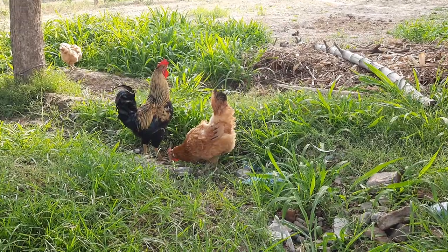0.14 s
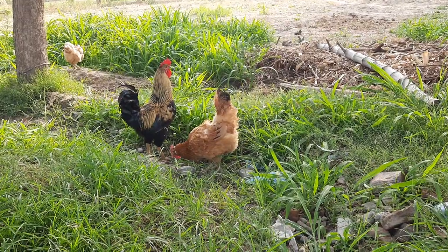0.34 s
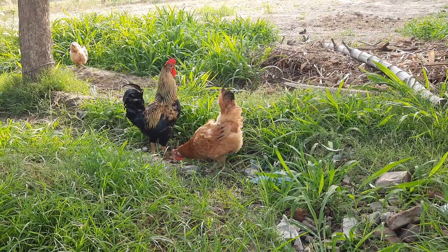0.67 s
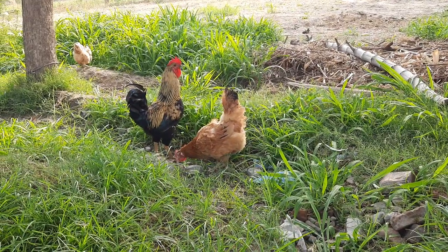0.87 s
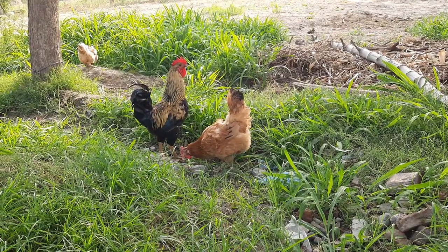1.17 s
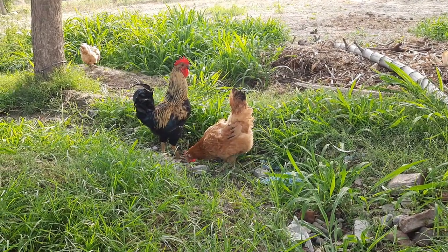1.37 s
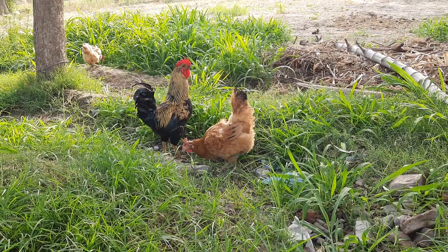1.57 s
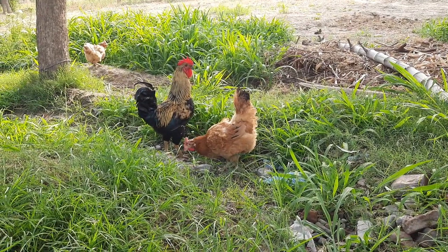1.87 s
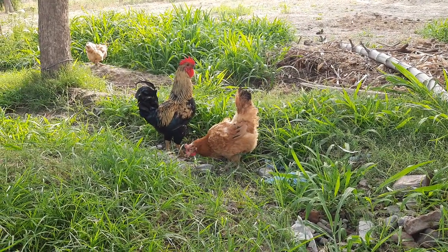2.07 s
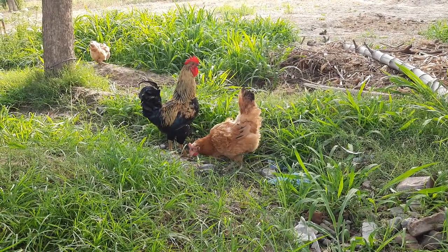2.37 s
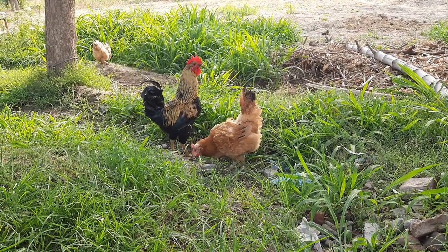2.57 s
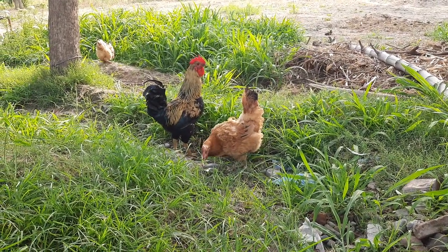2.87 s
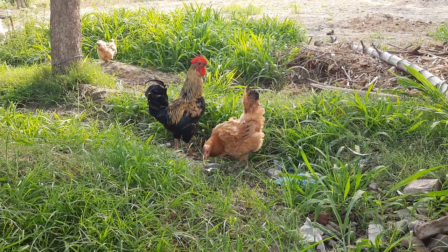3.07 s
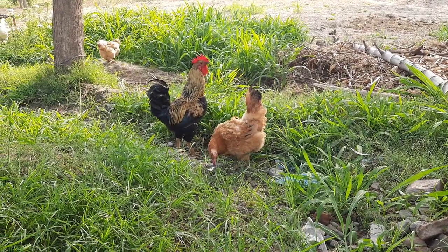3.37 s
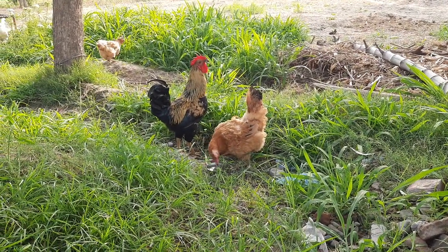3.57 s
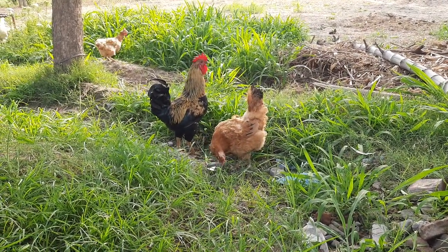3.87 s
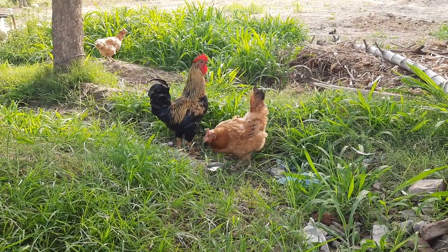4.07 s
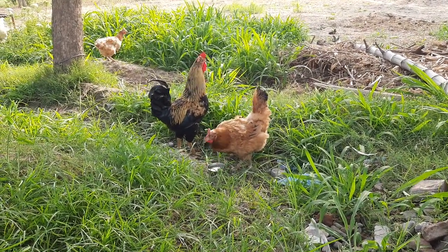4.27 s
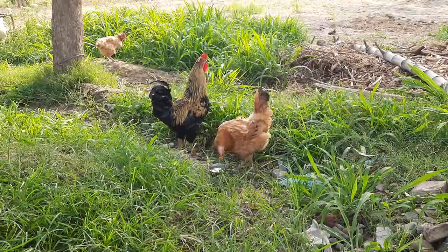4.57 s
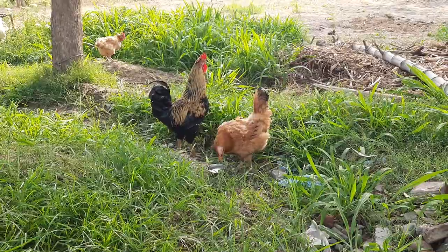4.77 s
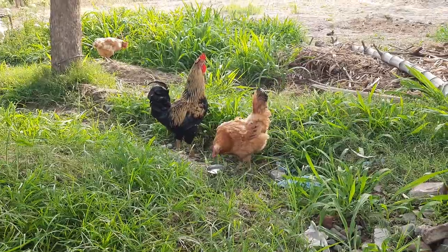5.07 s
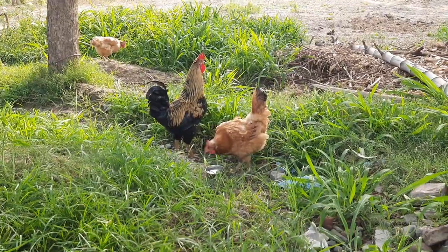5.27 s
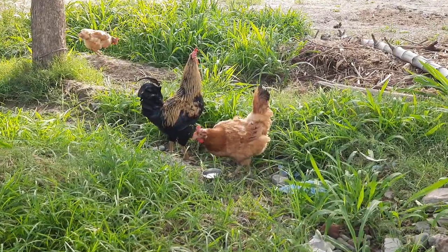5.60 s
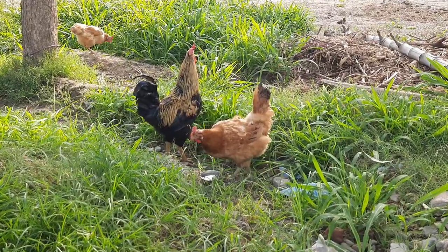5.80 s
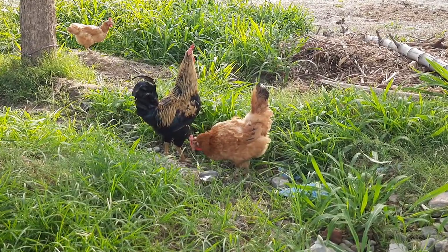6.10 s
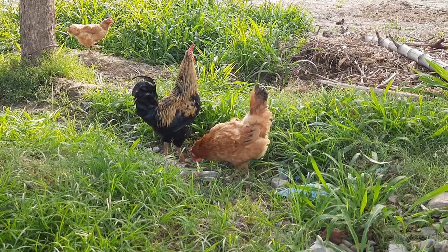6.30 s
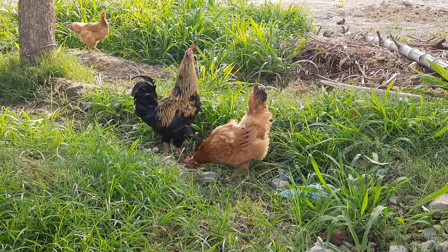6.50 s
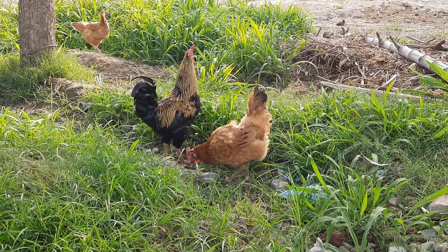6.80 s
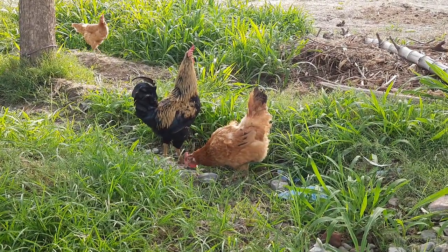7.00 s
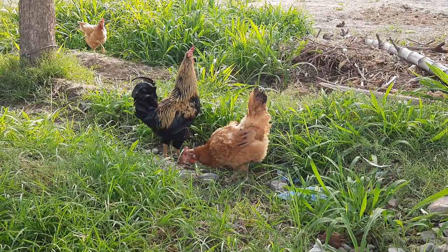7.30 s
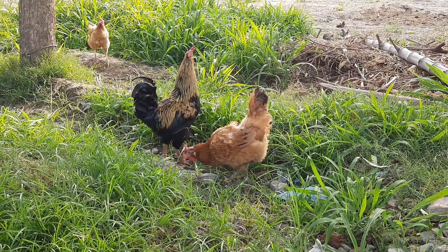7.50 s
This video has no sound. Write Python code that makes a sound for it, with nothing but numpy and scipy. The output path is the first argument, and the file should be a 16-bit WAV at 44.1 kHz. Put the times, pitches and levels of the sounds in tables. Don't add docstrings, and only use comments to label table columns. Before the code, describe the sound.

Hand-held microphone in a grassy yard with chickens. Crackly handling noise comes first, followed by abrupt, extremely close pops and knocks almost entirely in the right channel, far louder than everything else. Faint hen calls, high warbling runs and a fine insect trill sit behind, with soft rumble and leaf hiss. The later part is calmer and thinner on the right: distant whistles, two short raspy sparrow squawks, and a swell of leaves.

```python
import sys
import numpy as np
from scipy import signal
from scipy.fft import rfft, irfft, next_fast_len
from scipy.io import wavfile
from scipy.ndimage import uniform_filter1d, map_coordinates

SR = 44100
rng = np.random.default_rng(int(sys.argv[2]) if len(sys.argv) > 2 else 0)


def voltage_ratio(decibels):
    exponent = np.asarray(decibels, float) / 20
    return 10 ** exponent


def unload_audio(sound):
    columns = np.transpose(np.atleast_2d(sound))
    steps = np.round(np.clip(columns, -1, 1) * 32767)
    wavfile.write(sys.argv[1], SR, steps.astype(np.int16))


N = 337365

# start_s, peak_db, contact_ms, ring_db, knock_db
PUSHES = [(1.88727, -5.5, .08, 1, -19), (1.89519, -12.5, .1, -18, -12.5), (2.44434, -5.5, .068, -1, -19),
          (3.88983, -5.5, .057, -.5, -20), (4.34376, -1, .061, -8, -22), (4.40414, -8.5, .084, -43, -15),
          (3.53, -5.5, .07, 0, -17), (3.53062, -4.5, .05, -7, -15), (3.5376, -20, .2, -40, -4),
          (3.5609, -18, .25, -30, -10), (1.81, -29, .19, -12, -14), (3.9037, -22, .19, -25, -14),
          (3.9074, -27, .11, -18, -16), (3.9981, -25, .16, -28, -14)]
# start_s, peak_db, contact_ms, knock_db
PULLS = [
    (4.28568, -7, .039, -13.5),
    (4.37226, -.5, .037, -16.5),
    (3.99173, -14, .05, -13),
    (4.38402, -14, .03, -11.5),
    (.7501, -27, .15, -12),
    (1.991, -28, .06, -13),
    (3.547, -28, .05, -13),
    (3.8999, -25, .05, -13),
]
CASE_MODES = {1: [(1140, 1, .008), (570, -4, .007), (315, 5.5, .009)], -1: [(1110, 8.5, .0045),
              (553, 6, .008)]}
SPRING_BACK = {1: (.19, .0001, 0), -1: (.36, 0, .00014)}


def taps():
    out = np.zeros((2, N))
    t = np.arange(-40, 900) / SR
    after = np.clip(t, 0, 1)
    touch = np.clip(t + .00016, 0, 1)
    ring = voltage_ratio(10 - 60 * touch / .0018) * np.clip(touch / .00037, 0, 1) * np.cos(2 * np.pi * 6800 * t)
    ring += voltage_ratio(0.5 - 60 * np.abs(t) / 0.00033) * np.cos(2 * np.pi * 13200 * t)
    snap = voltage_ratio(9 - 60 * after / .00048) * np.clip(after / .00014, 0, 1) * np.cos(2 * np.pi * 4150 * t)
    snap += voltage_ratio(7 - 60 * after / .0015) * np.sin(2 * np.pi * 1030 * after)
    touches = [(*push, 1) for push in PUSHES]
    touches += [(*pull[:3], 0, pull[3], -1) for pull in PULLS]
    for s, db, contact_ms, ring_db, knock_db, sign in touches:
        width = contact_ms / 1000
        share, delay_s, spread_s = SPRING_BACK[sign]
        back_s, back_width = np.hypot(delay_s, 3 * width), np.hypot(spread_s, 3.7 * width)
        back = np.exp(-((t - back_s) / back_width) ** 2 / 2)
        pulse = np.exp(-(t / width) ** 2 / 2) - share * back
        pulse += voltage_ratio(ring_db) * (ring if sign > 0 else snap)
        modes = []
        for hz, level, t60 in CASE_MODES[sign]:
            softness = np.exp(-(np.pi * hz * width) ** 2)
            decay = voltage_ratio(knock_db + level - 60 * after / t60)
            modes.append(-decay * np.sin(2 * np.pi * hz * after) * softness)
        left = voltage_ratio(-54) * np.exp(-((t - .0006) / .0004) ** 2) * rng.standard_normal(len(t))
        if sign > 0:
            left += voltage_ratio(-8) * np.roll(modes[0], shift=24)
        else:
            left -= voltage_ratio(-15) * np.roll(modes[1], shift=15)
        add(out, s + t[0], sign * voltage_ratio(db) * np.array([left, pulse + sum(modes)]))
    null_hz, width_hz = 9020, 1800
    return filtered(out, lambda f: 1 - 1j * f * width_hz / (null_hz ** 2 - f * f + 1j * f * width_hz))


# start_s, length_s, level_db, dull_weight_db
SLIDES = [(0, 1, -69, 7), (0.394, 0.85, -67.5, 8.5), (0.947, 0.99, -81, 13.5), (1.75, 0.44, -75, 12.5),
          (2.21, 0.33, -70.5, 11.5), (2.42, 0.38, -68.5, 9.5), (2.634, 0.43, -63.5, 10),
          (3.035, 0.21, -67.5, 7.5), (3.15, 0.32, -65.5, 5), (3.4, 0.47, -73, -3),
          (3.709, 0.28, -56.5, -7.5), (3.891, 0.33, -63, -25), (4.2, 0.49, -72, -3), (7.48, 0.55, -71, -16)]
# start_s, peak_db
TICKS = [(0.0507, -45.5), (0.1864, -41.5), (.0995, -51), (0.2402, -43), (0.3616, -55), (.604, -39),
         (.642, -55), (.666, -55), (0.715, -43), (.766, -60), (.806, -53), (2.645, -40.5), (3.105, -49),
         (0.2721, -37.5), (0.3072, -43), (0.383, -43), (0.416, -43.5), (0.5154, -57), (0.5276, -40.5),
         (0.551, -52), (0.593, -36.5), (0.68, -41.5), (.6974, -41), (0.7317, -39.5), (0.7495, -34),
         (0.7868, -28.5), (0.819, -34.5), (0.837, -44), (1.0858, -47), (1.306, -45), (1.7883, -39),
         (2.468, -37), (2.5258, -36.5), (2.771, -39), (2.778, -41), (2.826, -40), (2.839, -35),
         (2.938, -43), (3.0497, -42), (3.5585, -25), (0.736, -37.5), (4.4605, -31)]


def rustle():
    resting_db, peaks_at = -90, 0.38
    t = np.arange(N) / SR
    bright, dull = np.full(N, voltage_ratio(resting_db)), np.full(N, voltage_ratio(resting_db + 2))
    for s, length, db, weight_db in SLIDES:
        rise_and_fall = np.interp(t, [s, s + peaks_at * length, s + length], [0, 1, 0])
        speed = np.sin(np.pi / 2 * rise_and_fall) ** 2
        bright += voltage_ratio(db) * speed
        dull += voltage_ratio(db + weight_db) * speed
    crackle = voltage_ratio(2.7 * wobble(45) + 3.0 * wobble(280))
    body = voltage_ratio(-1.0) * dull * unit(crackle * rng.standard_normal((2, N)))
    shine = voltage_ratio([[-5], [-1]]) * bright * unit(crackle * rng.standard_normal((2, N)))
    t = np.arange(200) / SR
    side = voltage_ratio([[-4], [0]])
    for s, db in TICKS:
        shine_db = -62.5 + (0.33 - 1) * (db + 37.0) + 38.5
        burst = voltage_ratio(db - 60 * t / 0.011) * np.clip(t / 0.00051, 0, 1) * rng.standard_normal((2, 2, len(t)))
        add(body, s, voltage_ratio(-0.5) * side * burst[0])
        add(shine, s, voltage_ratio(shine_db + 12.0) * side * burst[1])
    low = [(1500, -30.0), (2300, -0.5), (5500, -1.0), (9000, -14.5), (16000, -38.0)]
    high = [(5000, -9.5), (8500, -5.5), (15600, 6.5), (16000, -60.5)]
    return shaped(body, low) + shaped(shine, high)


# start_s, pitch_hz, level_db
SPARROW = [
    [(6.54, 1080, -62), (6.552, 1290, -48), (6.565, 1550, -46), (6.575, 2000, -46), (6.582, 2100, -60)],
    [(6.575, 3820, -50), (6.59, 3880, -39), (6.612, 4020, -35), (6.628, 3850, -35), (6.65, 3450, -35),
     (6.66, 3350, -54)],
    [(6.658, 2300, -56), (6.668, 1900, -44), (6.678, 1750, -44), (6.688, 1500, -58)],
    [(6.827, 1750, -58), (6.833, 1880, -45), (6.84, 2150, -50), (6.847, 2270, -40), (6.856, 2330, -43),
     (6.862, 2640, -38), (6.885, 2670, -38), (6.903, 2400, -50)],
    [(6.899, 2250, -56), (6.905, 2080, -37), (6.922, 1800, -36), (6.942, 1520, -41), (6.952, 1450, -62)],
]
RASP = [.4, .06, .55, .09, .12]
# pitch_hz, level_db
BEAK = [(1000, -30), (1900, -21), (2700, -6), (3700, 0), (4400, -3), (5300, -14), (8000, -20), (16000, -56)]
# pitch_hz, level_db
BREATH = [(1000, -26), (2200, -7), (3800, 4.5), (6000, -4.5), (9000, -17), (15600, -32), (15900, -70)]


def sparrow():
    squawk_db, breath_db = -2, -7.5
    out, air = np.zeros((2, N))
    for rows, rasp in zip(SPARROW, RASP):
        t = np.arange(rows[0][0], rows[-1][0], 1 / SR)
        count = len(t)
        hz, db = curves(rows, t)
        hz = uniform_filter1d(hz, 300) * (1 + 0.09 * rasp * wobble(450, count))
        k = np.arange(1, 9)[:, None]
        strength = voltage_ratio(along(BEAK, k * hz)) * (k * hz < 16000)
        tone = (strength * np.sin(2 * np.pi * k * np.cumsum(hz) / SR)).sum(0)
        tone *= 1 + .4 * np.sin(2 * np.pi * 66 * t)
        level = voltage_ratio(db + 1.3 * wobble(110, count))
        add(out, t[0], level * tone * (1 + 2.5 * rasp * wobble(900, count)))
        add(air, t[0], voltage_ratio(db + breath_db) * rng.standard_normal(count))
    out += shaped(air, BREATH)
    return yard(voltage_ratio(squawk_db) * out, wet_db=-5, t60=.55, echo_s=.062, echo_db=-13, blur=.008)


# time_s after the start, pitch_hz, level_db
RISE = [(0, 3807.5, -5), (.025, 4367, 4.5), (.055, 5186, 11), (.075, 5598, 2), (.09, 5542, -5)]
HOOK = [(0, 4350, -6), (.014, 4250, -1), (.03, 3650, -2), (.038, 4100, -2), (.046, 5200, 2),
        (.06, 5700, -10)]
SLOW_RISE = [(0, 4200, -6), (.03, 4650, 3), (.075, 5300, 4), (.11, 6050, -6)]
PEEP = [(0, 6700, -12), (.012, 7000, 0), (.03, 6850, -2), (.045, 6600, -10), (.07, 6400, -18)]
HEN = [(0, 1130, -10), (.1, 1155, -3), (.17, 1240, 0), (.235, 1380, -1), (.28, 1350, 1), (.335, 1130, -14)]
# shape, start_s, notes (count), level_db, pitch_factor, pitch_change per note
RUNS = [(RISE, .875, 1, -80, .96, 0), (SLOW_RISE, 1.082, 1, -70, 1, 0), (RISE, 1.308, 1, -71, 1.04, 0),
        (RISE, 1.505, 1, -69.5, 1.01, 0), (RISE, 1.703, 1, -69.5, .965, 0), (HEN, 2.03, 1, -74, 1, 0),
        (HEN, 4.01, 1, -76, 1, 0), (HEN, 5.68, 1, -78, 1, 0), (HOOK, 1.926, 8, -66, 1, 0),
        (PEEP, 1.465, 2, -71, 1, 0), (PEEP, 1.848, 8, -67.5, .995, 0)]


def warbler():
    pace_s = .2125
    note_db, note_pitch, note_s = .8, .006, .002
    out = np.zeros(N)
    for shape, first_s, notes, level_db, pitch, drift in RUNS:
        t = np.arange(0, shape[-1][0], 1 / SR)
        hz, db = curves(shape, t)
        for k, (late, loud, sharp) in enumerate(rng.standard_normal((round(notes), 3))):
            factor = pitch + drift * k + note_pitch * sharp
            shaky_hz = factor * hz * (1 + .011 * wobble(200, len(t)))
            size = voltage_ratio(level_db + note_db * loud + db + 1.1 * wobble(80, len(t)))
            note = size * np.sin(2 * np.pi * np.cumsum(shaky_hz) / SR)
            add(out, first_s + pace_s * k + note_s * late, note)
    return yard(out, wet_db=1.5, t60=.4, echo_s=.066, echo_db=-7, blur=.004)


# start_s, length_s, top_hz, level_db
ARCHES = [
    (.548, .177, 1350, -84),
    (.841, .115, 3800, -69),
    (3.35, .2, 2400, -83),
    (4.584, .27, 1490, -83),
    (4.96, .2, 2520, -81),
    (5.64, .157, 2690, -85),
    (7.56, .12, 1400, -79),
]
# start_s, length_s, start_hz, end_hz, level_db
WHISTLES = [(0, .074, 1370, 1220, -76), (.2, .4, 400, 399, -71), (.861, .062, 1680, 1760, -77),
            (1.178, .096, 2500, 3000, -77), (1.292, .066, 1680, 1700, -78), (2.33, .53, 605, 610, -77),
            (3.001, .25, 2560, 2380, -81), (3.35, .145, 1850, 1720, -80), (3.579, .12, 2150, 1900, -82),
            (4.51, .04, 3800, 3900, -75), (4.542, .016, 4250, 4850, -68), (4.555, .075, 4850, 4800, -77),
            (4.635, .05, 4700, 4600, -73), (4.685, .05, 4520, 4300, -75), (5.245, .03, 4500, 5500, -73),
            (4.575, .05, 3720, 4300, -71), (4.7, .27, 1830, 1950, -87), (4.74, .14, 4400, 4350, -80),
            (4.875, .075, 4800, 4650, -73), (4.95, .12, 4700, 4680, -81), (5.112, .04, 4720, 4600, -75),
            (5.15, .065, 4380, 4250, -73), (5.27, .03, 4200, 4000, -75), (5.29, .06, 3800, 3780, -78),
            (5.29, .13, 3050, 2880, -86), (7.095, .2, 2170, 2120, -78), (7.455, .04, 5000, 4200, -69),
            (1.22, .06, 4850, 4550, -73), (5.34, .05, 4300, 3780, -76), (5.39, .11, 4000, 4150, -78),
            (5.518, .2, 1900, 1900, -85), (5.52, .1, 1330, 1200, -80), (5.6, .14, 1150, 1130, -83),
            (5.5, .06, 4150, 4250, -77), (5.62, .04, 3920, 3880, -74), (5.835, .05, 4320, 4250, -75),
            (6.055, .035, 4250, 3700, -73), (5.96, .06, 4650, 3700, -75), (5.7, .2, 730, 765, -80)]
# start_s, length_s, start_hz, end_hz, level_db
HIDDEN = [
    (5.24, .05, 4600, 5700, -70),
    (5.68, .1, 5000, 3700, -72),
    (5.8, .13, 3000, 4800, -76),
    (5.955, .16, 4700, 2700, -71),
    (5.95, .04, 5600, 5000, -73),
    (6.2, .05, 3750, 5500, -68),
    (6.25, .17, 4100, 3750, -78),
    (6.42, .04, 4250, 5500, -70),
    (7.49, .08, 4800, 3700, -78),
]
# start_s, peak_db, pitch_hz
CLUCKS = [
    (3.293, -45, 1720),
    (3.356, -46, 1750),
    (3.504, -34.5, 330),
    (4.108, -53.5, 1490),
    (4.539, -53, 2200),
    (5.512, -53, 1540),
]
# start_s, peak_db, pitch_hz
RATTLE = [
    (3.695, -50, 900),
    (3.706, -51, 1000),
    (3.717, -51, 950),
    (3.728, -47, 850),
]


def far_birds():
    arches = [(s, s + length, .84 * hz, hz, .93 * hz, db) for s, length, hz, db in ARCHES]
    out = glides(arches + straight(WHISTLES), waver=.011)
    pops = np.zeros(N)
    t = np.arange(400) / SR
    for s, db, hz in CLUCKS:
        onset = np.clip(t / .0006, 0, 1)
        add(pops, s, voltage_ratio(db - 60 * t * hz / 9) * np.sin(2 * np.pi * hz * t) * onset)
    for s, db, hz in RATTLE:
        click = np.sin(2 * np.pi * hz * t) + .6 * np.sin(4 * np.pi * hz * t)
        add(out, s, voltage_ratio(db - 60 * t * hz / 5) * click)
    hidden = glides(straight(HIDDEN), waver=.015)
    hidden = yard(hidden, wet_db=.1, t60=.5, echo_s=.05, echo_db=-6, direct=.45)
    pops = yard(pops, wet_db=.5, t60=.35, echo_s=.03, echo_db=-9)
    return hidden + pops + yard(out, wet_db=-1, t60=.3, echo_s=.05, echo_db=-14)


# start_s, end_s, level_db
CRICKET = [
    (0.282, 1.076, -81.5),
    (1.41, 3.345, -82.5),
    (3.334, 4.223, -81),
    (5.098, 6.076, -81.5),
    (6.755, 7.535, -82),
]


def cricket():
    t = np.arange(N) / SR
    wing = unit(filtered(rng.standard_normal((2, N)), lambda hz: np.exp(-((hz - 8850) / 160) ** 2)))
    trill = np.zeros(N)
    for start, end, db in CRICKET:
        trill += voltage_ratio(db) * np.clip(np.minimum((t - start) / 0.073, (end - t) / 0.0083), 0, 1)
    return trill * wing * (1 + 0.16 * np.sin(2 * np.pi * 62 * t))


# time_s,
# strength_db
HISS_SWELL = [(0, 1), (.64, 4), (2.7, 3.5), (3.8, 0), (4.4, 3), (4.8, -4.5), (5.2, 1), (5.8, 7), (6.5, 1.5),
              (6.9, 17), (7.3, 2.5), (7.65, 4)]
# pitch_hz, level_db
RUMBLE = [(22, -58.5), (36, -16.5), (55, 5.5), (120, -3), (250, -11), (450, -30), (900, -63.5)]
HUM = [(200, -5.5), (400, 5), (800, -2), (1300, -15), (2500, -11.5), (5000, -69.5)]
LEAVES = [(1200, -4), (2500, -12), (4200, 7), (6000, -2), (8000, -4), (10000, -17), (15600, -11.5),
          (16000, -73)]
CHORUS = [(5000, -46.5), (5900, -5), (6600, -4.5), (7200, -8), (7700, -29)]


def background():
    t = np.arange(N) / SR
    swell_db, = curves(HISS_SWELL, t)
    air = voltage_ratio(-48) * rush(RUMBLE, .93, patchy_db=1.0)
    air += voltage_ratio(-68.5 + 0.16 * swell_db) * rush(HUM, 0.074, patchy_db=2.5)
    air += voltage_ratio(-74 + swell_db) * rush(LEAVES, 0.018, patchy_db=2.5)
    air += voltage_ratio(-76.5 + 0.68 * t) * rush(CHORUS, 0.014, patchy_db=2.5)
    return air


def unit(x):
    return x / np.sqrt(np.mean(x ** 2) + 1e-20)


def along(points, hz):
    f, v = np.transpose(points)
    return np.interp(np.log(hz + 1), np.log(f + 1), v)


def curves(rows, t):
    s, *cols = np.transpose(rows)
    return [np.interp(t, s, c) for c in cols]


def wobble(rate, count=N):
    knots = rng.standard_normal(int(count * rate / SR) + 4)
    return map_coordinates(knots, [np.arange(count) * rate / SR])


def filtered(x, response):
    m = next_fast_len(N + SR // 4)
    return irfft(rfft(x, m) * response(np.fft.rfftfreq(m, 1 / SR)), m)[..., :N]


def shaped(x, points):
    return filtered(x, lambda hz: voltage_ratio(along(points, hz)))


def add(track, s, sound):
    part = track[..., round(s * SR):][..., :sound.shape[-1]]
    part += sound[..., :part.shape[-1]]


def glides(rows, waver):
    out = np.zeros(N)
    for start, end, a, b, c, db in rows:
        u = np.linspace(0, 1, round((end - start) * SR))
        hz = a * (1 - u) * (1 - 2 * u) + 4 * b * u * (1 - u) + c * u * (2 * u - 1)
        hz *= 1 + waver * wobble(50, len(u))
        flutter = voltage_ratio(2 * wobble(35, len(u))) * np.sin(np.pi * u) ** .4
        add(out, start, voltage_ratio(db) * flutter * np.sin(2 * np.pi * np.cumsum(hz) / SR))
    return out


def straight(rows):
    return [(s, s + length, a, (a + c) / 2, c, db) for s, length, a, c, db in rows]


def rush(spectrum, alike, patchy_db):
    z = signal.stft(rng.standard_normal((2, N)), nperseg=512)[2]
    field = uniform_filter1d(uniform_filter1d(rng.standard_normal(z.shape[1:]), 6, 0), 14, 1)
    pair = signal.istft(z * voltage_ratio(patchy_db * unit(field)), nperseg=512)[1][:, :N]
    mid, side = shaped(pair, spectrum)
    turn = np.arccos(alike) / 2
    return unit(np.cos(turn) * mid + np.sin(turn) * side * [[1], [-1]])


def yard(x, wet_db, t60, echo_s, echo_db, blur=0.032, direct=1):
    t = np.arange(SR * 3 // 4) / SR

    def wall(s, width):
        return np.exp(-((t - s) / width) ** 2) / np.sqrt(width * SR)

    tail = voltage_ratio(-60 * t / t60) * np.clip(t / 0.0059, 0, 1)
    shape = voltage_ratio(wet_db) * tail / np.linalg.norm(tail)
    shape += voltage_ratio(echo_db) * wall(echo_s, blur) + voltage_ratio(echo_db - 11) * wall(.247, .006)
    scatter = rng.standard_normal((2, len(t))) * shape
    return direct * x + signal.fftconvolve(x[None], scatter, axes=1)[:, :N]


# pitch_hz, width_hz, level_db
PORT = [(4100, 5370, 2), (6470, 800, 12.5)]


def port_cavity(right):
    def lift(f):
        return 1 + sum(voltage_ratio(db) * 1j * f * w / (c * c - f * f + 1j * f * w) for c, w, db in PORT)

    return filtered(right, lift)


def scene():
    air = background() + cricket() + sparrow() + warbler() + far_birds() + rustle()
    left, right = filtered(air, lambda hz: hz < 15800)
    return np.array([left, port_cavity(right)]) + taps()


# pitch_hz, level_db
WIND_CUT = [(50, -32), (110, -25.5), (200, -29.5), (380, 4.5), (700, -3.5), (1200, -3)]


def wind_filter(right):
    since = np.arange(N) / SR - 4.945
    on = np.clip(since / 0.0056, 0, 1)
    dip = voltage_ratio(-6 * np.exp(-np.abs(since) / 0.17))
    return (1 - on) * right + on * dip * shaped(right, WIND_CUT)


def top_cut(x):
    return signal.sosfilt(signal.butter(12, 17140, fs=SR, output="sos"), x)


def record(dry):
    def band_limits(hz):
        return 1 / (1 + (hz / 16900) ** 60) * hz ** 2 / (hz ** 2 + 24 ** 2) * (hz < 17100)

    band = filtered(np.array([dry[0], wind_filter(dry[1])]), band_limits)
    ceiling = .96
    mix = band / (1 + np.abs(band / ceiling) ** 8) ** (1 / 8)
    return top_cut(mix)


dry = scene()
out = record(dry)
unload_audio(out)
```